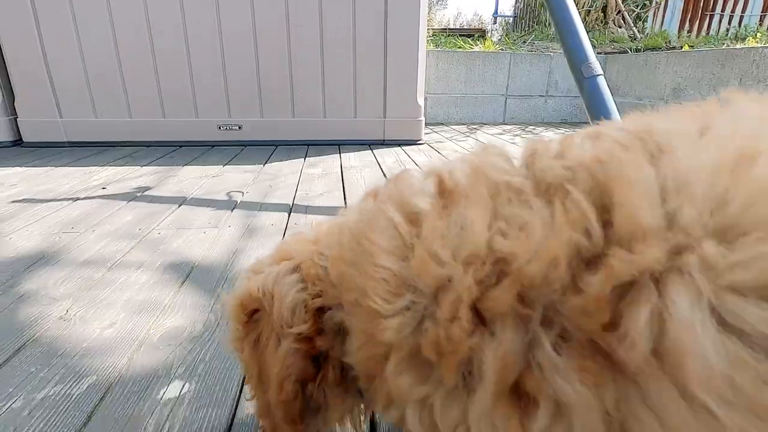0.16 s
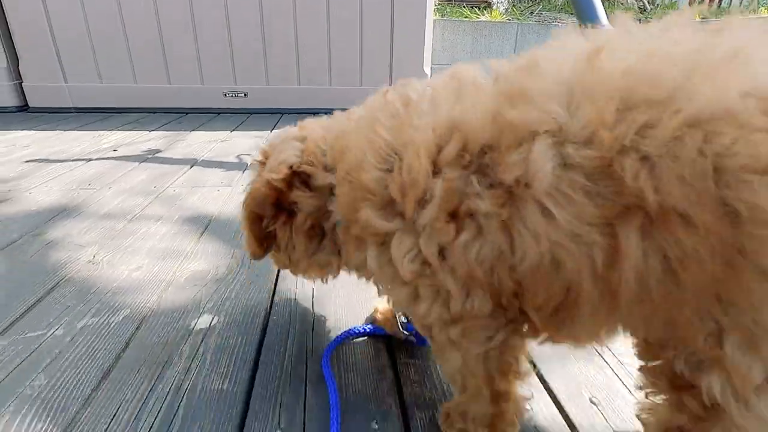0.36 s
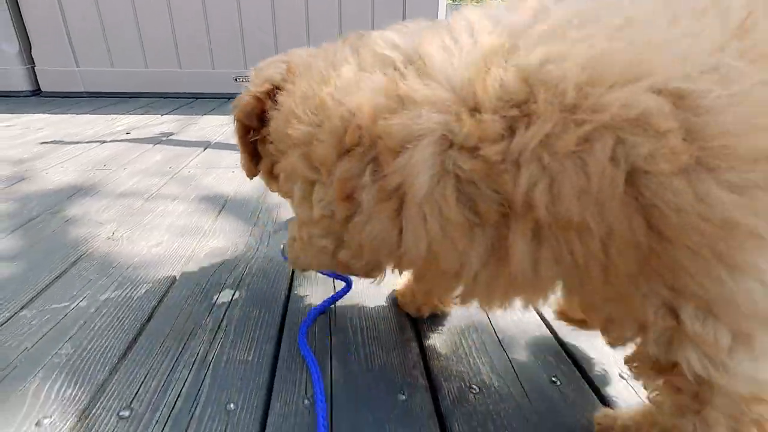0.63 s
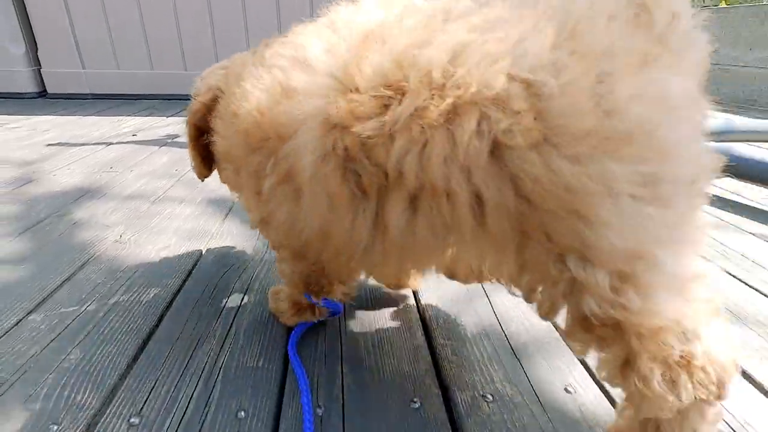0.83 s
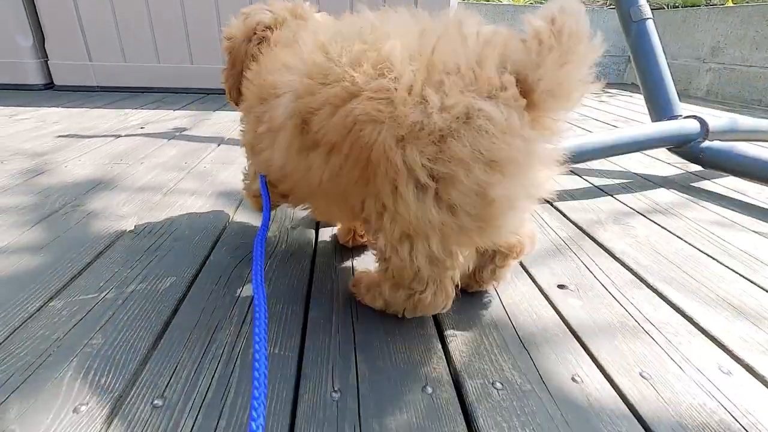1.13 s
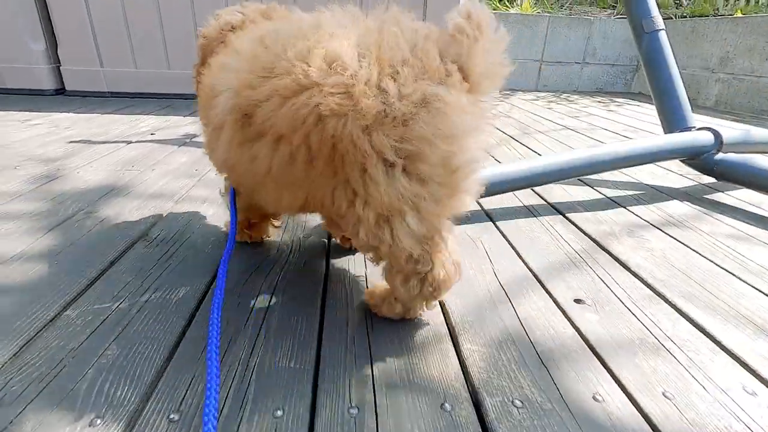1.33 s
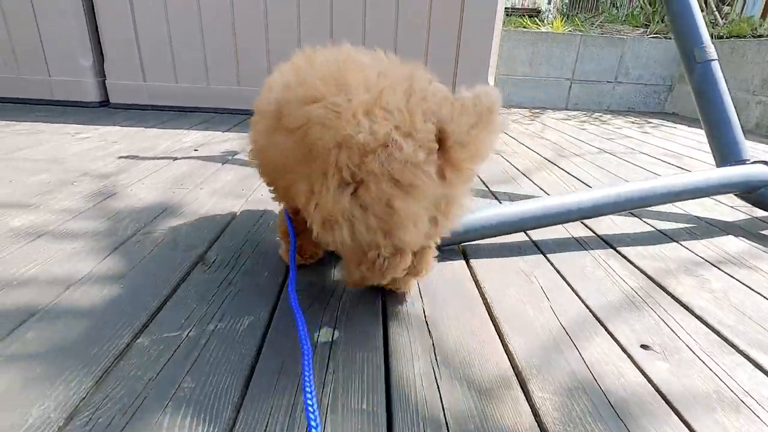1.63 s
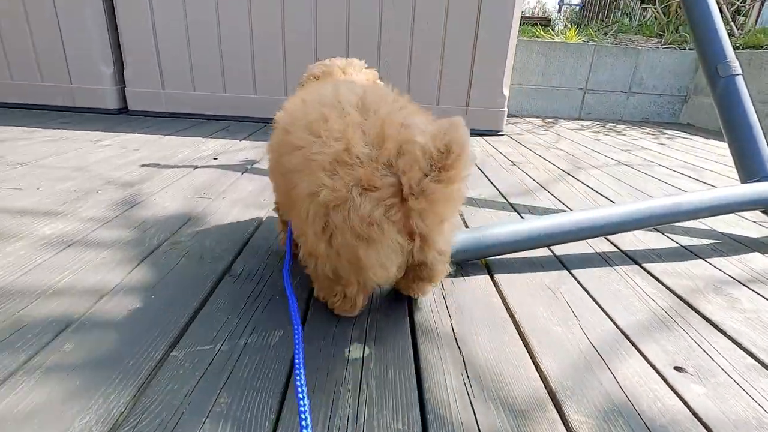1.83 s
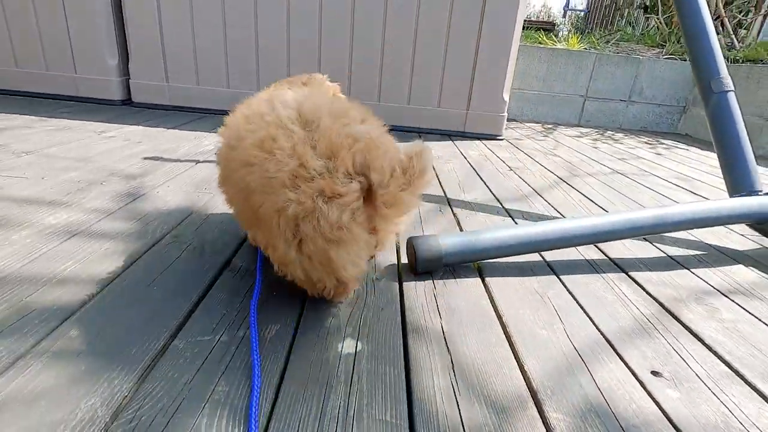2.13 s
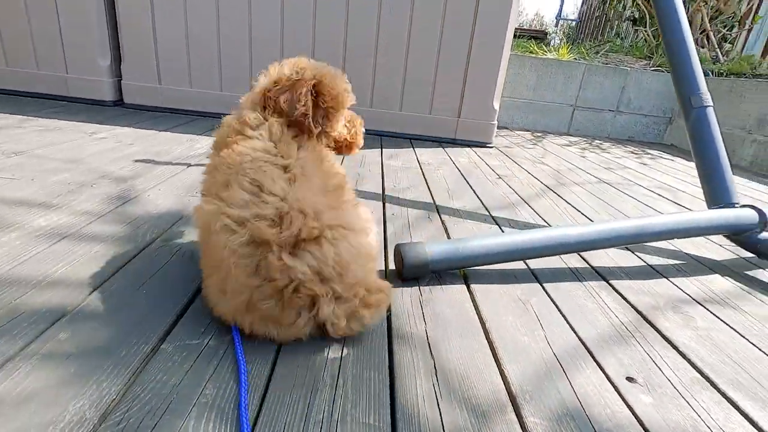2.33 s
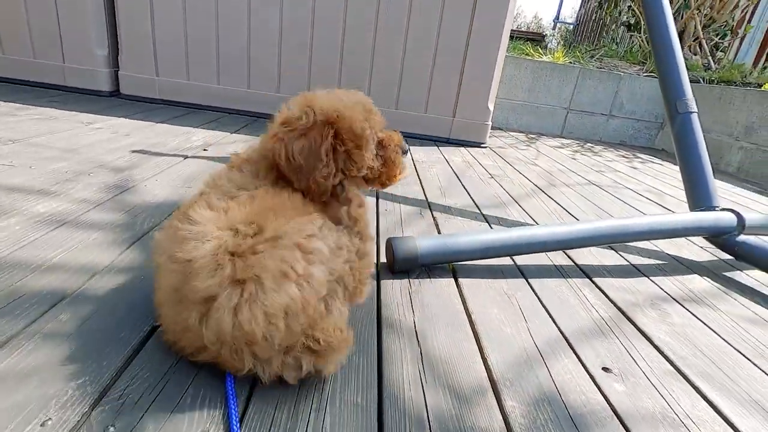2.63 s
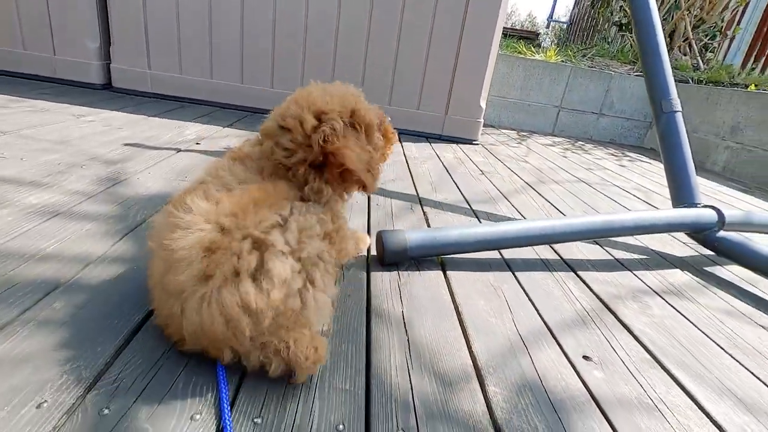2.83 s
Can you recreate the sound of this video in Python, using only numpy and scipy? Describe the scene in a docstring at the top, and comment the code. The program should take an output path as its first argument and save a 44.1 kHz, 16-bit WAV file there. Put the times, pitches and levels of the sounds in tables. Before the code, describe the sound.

Light puppy steps click and brush on wooden boards, with faint wind and distant traffic.

```python
"""A puppy pads across a wooden deck outdoors, trailing a rope leash, and sits down.
Claws and the leash clasp tick, paws and rope scuff over the grain, one claw scrapes.
The sliding clasp rings; hard touches knock on the boards, soft pads thud in the deck.
Behind: low wind buffeting the microphone, distant traffic, faint hiss."""
import sys
import numpy as np
from scipy import signal
from scipy.fft import rfft, irfft
from scipy.io import wavfile
from scipy.ndimage import uniform_filter1d

SR = 44100
rng = np.random.default_rng(int(sys.argv[2]) if len(sys.argv) > 2 else 0)


def store_wav(level_fs):
    """Save 16-bit WAV to argv[1]."""
    pcm = np.round(np.clip(np.atleast_2d(level_fs), -1, 1) * 32767)
    wavfile.write(sys.argv[1], SR, pcm.T.astype(np.int16))


N = 131418

# deck contact colour, ticks and scuffs: freq_hz, gain_db
CONTACT_EQ = [(300, 8), (1000, 9), (1500, 9), (2400, 6.5), (3300, 7), (4200, 2.5), (5000, 2.5), (5600, 0.5),
              (6200, 0.5), (7000, 1), (9000, 1), (11500, 1), (13500, -3), (16000, -7)]


def undb(db):
    """Decibels to gain."""
    return 10 ** (np.asarray(db) / 20)


def unit(x):
    """Scale to rms 1."""
    return x / np.sqrt(np.mean(x ** 2) + 1e-20)


def freqs(x):
    """FFT bin frequencies, floored at 1 Hz."""
    return np.maximum(np.arange(len(x) // 2 + 1) * SR / len(x), 1)


def colour(x, points):
    """Equalise by (freq_hz, gain_db) points; rms 1."""
    hz, db = np.array(points).T
    gain = undb(np.interp(np.log(freqs(x)), np.log(hz), db))
    return unit(irfft(rfft(x) * gain, len(x)))


def hump(x, hz, octaves):
    """Broad resonance, bell-shaped in log frequency."""
    return irfft(rfft(x) / (1 + .5 * (np.log2(freqs(x) / hz) / octaves) ** 2) ** 2, len(x))


def drift(rate_hz):
    """Smooth random drift, rms 1."""
    span = int(SR / rate_hz)
    return unit(uniform_filter1d(uniform_filter1d(rng.standard_normal(N), span), span))


def curve_db(points):
    """Interpolate (time_s, level_db) points per sample."""
    times_s, db = np.array(points).T
    return np.interp(np.arange(N) / SR, times_s, db)


def since(start_s):
    """Seconds since start_s, zero before."""
    return np.maximum(np.arange(N) / SR - start_s, 0)


def swell(start_s, rise_s, fall_s):
    """Stroke envelope: pressure builds, then lets go."""
    t = since(start_s)
    return np.minimum(t / rise_s, 1) * np.exp(-(np.maximum(t - rise_s, 0) / fall_s) ** 1.82)


def ring(start_s, hz, decay_s):
    """One struck mode."""
    t = since(start_s)
    return np.sin(2 * np.pi * hz * t) * np.exp(-t / decay_s)


def add(out, start_s, x):
    """Mix x into out at start_s."""
    i = max(int(start_s * SR), 0)
    out[i:i + len(x)] += x[:max(N - i, 0)]


def friction(size):
    """Fibres catch on wood grain: dense clicks in soft hiss."""
    catches_per_s, spread_db, catch_share = 3500, 5.5, 0.39
    catches = (rng.random(size) < catches_per_s / SR) * rng.choice([-1, 1], size)
    catches = unit(catches * undb(spread_db * rng.standard_normal(size)))
    return np.sqrt(catch_share) * catches + np.sqrt(1 - catch_share) * rng.standard_normal(size)


def air():
    """Faint hiss, slowly rising."""
    # hiss spectrum: freq_hz, density_db
    spectrum = [(500, -3), (2000, -1), (4000, 0), (7000, 0), (10500, 1.5), (13000, 1), (16000, -3.5)]
    # hiss envelope: time_s, level_db
    levels = [(0, -58.5), (.28, -56.5), (.6, -55), (1.5, -53), (2.98, -50.5)]
    return colour(rng.standard_normal(N), spectrum) * undb(curve_db(levels))


def traffic():
    """Distant traffic: a smooth wash, swaying slightly."""
    # wash spectrum: freq_hz, density_db
    spectrum = [(30, -2), (58, -2), (72, -0.5), (90, 0.5), (118, -14.5), (160, -10.5), (270, -19.5),
                (315, -15.5), (360, -20.5), (650, -22), (1100, -29), (1600, -31.5), (2600, -38.5),
                (5000, -43.5), (10000, -43), (16000, -57)]
    # wash envelope: time_s, level_db
    levels = [(0, -33), (.3, -32), (.55, -32.5), (1.0, -33), (1.6, -32), (2.1, -33), (2.7, -31),
              (2.98, -30.5)]
    wash = colour(rng.standard_normal(N), spectrum)
    sway_db = 0.35 * drift(rate_hz=4.1)
    return wash * undb(curve_db(levels) + sway_db)


def wind():
    """Low eddies at the microphone, following the gusts."""
    # eddy spectrum: freq_hz, density_db
    spectrum = [(10, -10), (24, -8.5), (34, -0.5), (42, -5), (52, -14.5), (70, -21), (120, -28), (300, -63),
                (2000, -101)]
    # gust envelope: time_s, relative_db
    gusts = [(0.0, -25.5), (0.2, -20), (0.24, -28), (0.36, -18), (0.46, -32), (0.58, -21), (1.3, -25),
             (1.33, -17.5), (1.47, -24.5), (1.7, -19), (1.82, -26.5), (1.96, -23), (2.05, -29),
             (2.39, -25.5), (2.46, -18.5), (2.5, -25.5), (2.81, -23), (2.98, -26)]
    gain_db = -1.5
    eddies = colour(rng.standard_normal(N), spectrum)
    running_rms = np.sqrt(uniform_filter1d(eddies ** 2, SR // 10) + 1e-9)
    return unit(eddies / running_rms) * undb(gain_db + curve_db(gusts))


def thuds():
    """Soft pads excite the deck's low modes."""
    # footfalls: start_s, level_db
    footfalls = [(0.461, -40), (0.549, -33), (.768, -43), (1.003, -28), (1.0148, -34.5), (1.028, -33.5)]
    # deck modes: freq_hz, gain_db, decay_s
    modes = [(88, -3, 0.035), (131, -2, 0.017), (182, 2.5, 0.012), (252.8, -4, 0.027), (310.5, -9.5, 0.038)]
    return sum(undb(db + mode_db) * ring(start_s, hz, decay_s)
               for start_s, db in footfalls for hz, mode_db, decay_s in modes)


def knocks():
    """Hard touches crack on a board and ring it."""
    # board hits: start_s, ring_db, pitch_hz, decay_s, crack_db
    hits = [(0.2346, -36.5, 2000, 0.0032, -39), (.4035, -46, 2320, .004, -48),
            (0.769, -34, 892, 0.0062, -39), (0.9102, -35, 1160, 0.0023, -53),
            (1.0066, -35, 906, 0.0053, -49), (1.699, -44, 2040, 0.0032, -37),
            (1.705, -47, 2060, 0.005, -42), (2.1922, -30.5, 1580, .0036, -56),
            (2.683, -46, 1494, 0.005, -39)]
    # board modes: pitch_ratio, gain_db
    modes = [(.55, -3), (1, 1), (1.13, -19), (1.85, -15)]
    crack_decay_s = 0.0029
    out, t = np.zeros(N), np.arange(2 ** 11) / SR
    for start_s, ring_db, hz, decay_s, crack_db in hits:
        out += sum(undb(ring_db + db) * ring(start_s, hz * ratio, decay_s) for ratio, db in modes)
        crack = unit(hump(rng.standard_normal(len(t)), hz, octaves=0.79))
        add(out, start_s, undb(crack_db) * crack * np.exp(-t / crack_decay_s))
    return out


def clasp():
    """Sliding rings the small metal leash clasp."""
    # clasp slides: start_s, rise_s, fall_s, level_db
    slides = [(.293, .006, .02, -54), (.655, .025, 0.05, -41.5), (1.102, 0.014, 0.026, -41.5),
              (1.133, 0.0056, 0.043, -40.5), (2.034, .006, 0.022, -49)]
    # clasp modes: freq_hz, width_hz, gain_db
    modes = [(3200, 350, -11.5), (6160, 82, -4), (7480, 250, -6.5), (9430, 410, -9), (10100, 310, 0.5),
             (11150, 460, -16)]
    rub = friction(N)
    f = freqs(rub)
    body = sum(undb(db) / (1 + 1j * (f / hz - hz / f) * hz / width_hz) for hz, width_hz, db in modes)
    pressure = sum(undb(db) * swell(start_s, rise_s, fall_s) for start_s, rise_s, fall_s, db in slides)
    return unit(irfft(rfft(rub) * body, N)) * pressure


def scrape():
    """A claw catches and slips on the grain; its resonance sinks as the paw takes weight."""
    start_s, level_db, grit_db = 0.64, -36.5, 7.5
    from_hz, fall_oct_per_s, half_width_hz = 13000, 14, 2500
    centre_hz = from_hz * 2 ** (-fall_oct_per_s * since(start_s))
    rub = friction(N)
    baseband = unit(irfft(rfft(rub) / (1 + (freqs(rub) / half_width_hz) ** 2), N))
    squeal = np.sqrt(2) * baseband * np.sin(2 * np.pi * np.cumsum(centre_hz) / SR)
    grit = unit(undb(grit_db * drift(rate_hz=370)))
    return undb(level_db) * swell(start_s, rise_s=0.036, fall_s=0.039) * grit * squeal


def scuffs():
    """Paws, fur and rope brush the boards with uneven pressure."""
    # brush strokes: start_s, rise_s, fall_s, level_db, centre_hz, spread_oct
    strokes = [(.134, .003, 0.011, -44.5, 7400, 0.77), (0.293, .008, 0.04, -50.5, 9400, 0.36),
               (0.311, 0.0053, 0.015, -48, 4900, 0.75), (.362, .022, .008, -46, 5450, 1),
               (0.425, 0.0049, 0.024, -47, 8450, 1.2), (0.497, 0.022, 0.0055, -44.5, 6440, 1.2),
               (.54, .01, .015, -52, 10000, .6), (.626, 0.036, 0.07, -39.5, 12000, 0.74),
               (.652, 0.017, 0.054, -41, 5600, 0.55), (.66, 0.12, 0.029, -45.5, 900, 1.5),
               (0.737, 0.0074, 0.02, -36.5, 10800, 1.2), (.773, 0.0043, 0.012, -40, 8800, .4),
               (.764, 0.0023, 0.023, -40.5, 3960, 0.78), (.872, .005, 0.14, -50, 6800, 1.1),
               (1.007, 0.027, 0.059, -45.5, 8900, 1.3), (1.134, 0.0099, 0.015, -42.5, 7300, 0.43),
               (1.282, 0.053, 0.061, -36.5, 7600, 1.68), (1.36, 0.062, 0.13, -45.5, 6360, 1.9),
               (1.530, .01, 0.022, -42, 2800, 2.6), (1.57, 0.023, 0.17, -53, 8150, 0.67),
               (1.785, 0.092, 0.11, -41.5, 11300, 0.88), (1.765, 0.053, 0.11, -50, 5570, 0.55),
               (1.927, .009, 0.04, -42.5, 11300, 0.43), (2.051, 0.095, 0.2, -53, 9000, 1),
               (2.29, 0.086, 0.23, -47.5, 8220, 0.66), (2.384, 0.019, 0.031, -45.5, 3500, 1.7),
               (2.46, 0.026, 0.24, -46, 8800, 1.23), (2.58, .085, 0.032, -48, 4670, 0.83),
               (2.654, 0.028, 0.016, -41, 8760, 0.39), (2.762, 0.0025, 0.032, -43, 5000, 1.1),
               (2.79, 0.07, 0.2, -49, 9700, 1.8), (2.925, 0.059, 0.047, -36.5, 10700, 0.87)]
    out = np.zeros(N)
    for start_s, rise_s, fall_s, db, hz, spread_oct in strokes:
        rub = np.zeros(N)
        add(rub, start_s, colour(hump(friction(32768), hz, spread_oct), CONTACT_EQ))
        out += undb(db) * swell(start_s, rise_s, fall_s) * rub
    uneven_db = drift(rate_hz=100)
    return out * undb(uneven_db)


def ticks():
    """Claws and clasp hit the boards: graze, snap, brief chatter, faint tail."""
    # hard contacts: snap_s, level_db, centre_hz, spread_oct, decay_s
    contacts = [(0.1343, -47, 7500, .6, 0.0018), (0.177, -28, 12000, 0.15, .0006),
                (.1770, -32, 5600, 0.4, .0005), (0.384, -42, 6300, 0.23, .002),
                (.4290, -45, 8950, 0.83, 0.0022), (0.4804, -39, 9250, 0.68, 0.0028),
                (0.481, -42, 4900, 0.12, 0.005), (.5195, -49, 4500, 0.2, 0.004),
                (0.7025, -31, 10500, 0.25, .002), (0.706, -21, 11000, .2, 0.0018),
                (0.7076, -26, 8000, 0.74, 0.00091), (0.7703, -17, 9200, 0.42, 0.00046),
                (0.7697, -22, 6180, 0.09, 0.0014), (.7785, -41.5, 3300, 0.17, 0.011),
                (.7783, -31, 6000, 1, 0.00096), (0.9108, -25, 6800, 1.1, 0.0011),
                (0.9554, -33, 7440, 0.77, 0.0017), (0.9608, -30.5, 7900, 0.87, 0.0013),
                (1.0065, -25, 8700, 0.67, 0.00059), (1.0080, -33, 5500, 0.9, 0.0038),
                (1.6998, -32, 5900, 0.35, 0.0018), (1.7045, -30, 6650, 0.7, 0.0026),
                (1.7675, -38, 5950, 0.55, 0.002), (1.8035, -33, 8750, 0.6, 0.0018),
                (1.9356, -34, 12000, 0.27, .002), (2.041, -35, 9800, 0.17, 0.0014),
                (2.236, -38, 11000, .5, .0005), (2.239, -35, 7160, 0.65, 0.0033),
                (2.254, -39.5, 4970, 1.7, .0035), (2.5575, -32, 8200, 0.23, .0006),
                (2.666, -29, 10300, 0.51, .002), (2.679, -27, 8000, .6, .0006),
                (2.6842, -27.5, 8800, .45, 0.001), (2.951, -29.5, 9500, 0.86, 0.0011)]
    graze_db, graze_rise_s = -16, 0.0031
    tail_db, tail_decay_s = -31.5, 0.017
    out, t = np.zeros(N), np.arange(2 ** 12) / SR
    graze = undb(graze_db) * np.exp(-t[::-1] / graze_rise_s)
    tail = undb(tail_db) * np.exp(-t / tail_decay_s)
    for snap_s, db, hz, spread_oct, decay_s in contacts:
        envelope = np.concatenate([graze, np.exp(-t / decay_s) + tail])
        force = rng.standard_normal(len(envelope)) * envelope
        force[len(graze)] += 1.6  # snap impulse
        tick = colour(hump(force, hz, spread_oct), CONTACT_EQ)
        envelope_rms = np.sqrt(np.mean(envelope ** 2))
        add(out, snap_s - len(graze) / SR, undb(db) * envelope_rms * tick)
    return out


def scene():
    """Puppy close by, over hiss, traffic and wind; mono."""
    background = air() + traffic() + wind()
    puppy = thuds() + knocks() + clasp() + scrape() + scuffs() + ticks()
    return (background + puppy)[None]


def record(dry):
    """Recorder band limit: steep elliptic low-pass."""
    cutoff_hz = 15750
    return signal.sosfilt(signal.ellip(10, .2, 70, cutoff_hz, fs=SR, output="sos"), dry)


dry = scene()
out = record(dry)
store_wav(out)
```